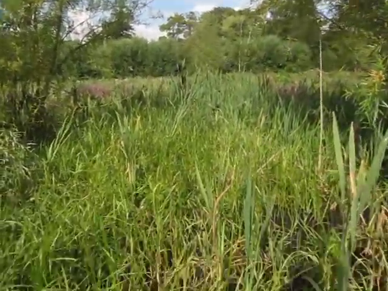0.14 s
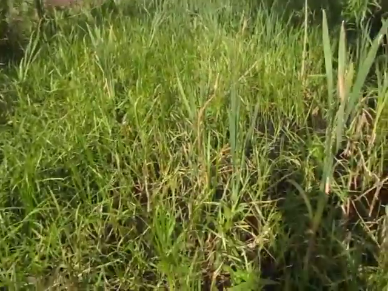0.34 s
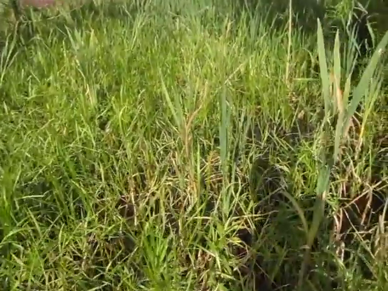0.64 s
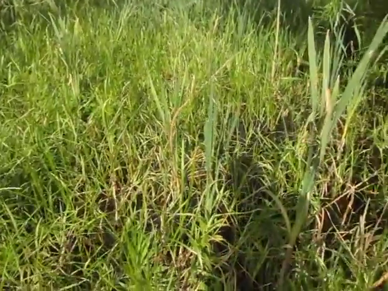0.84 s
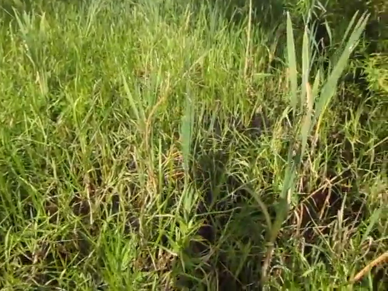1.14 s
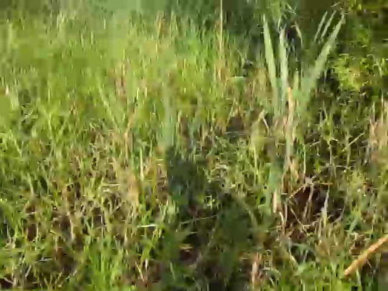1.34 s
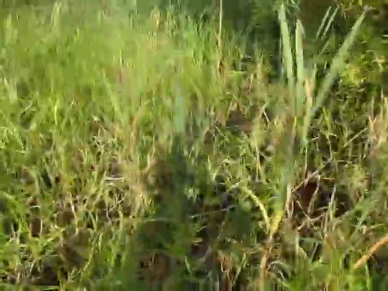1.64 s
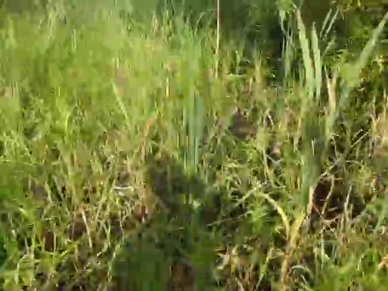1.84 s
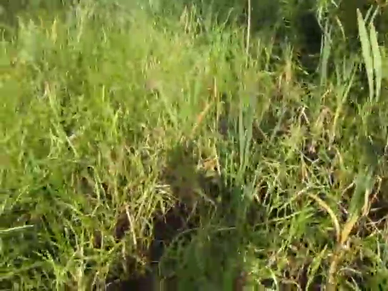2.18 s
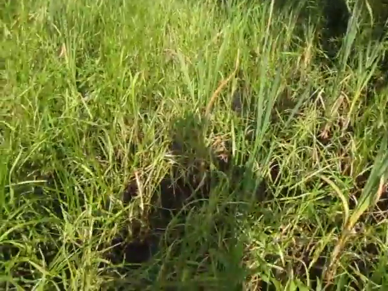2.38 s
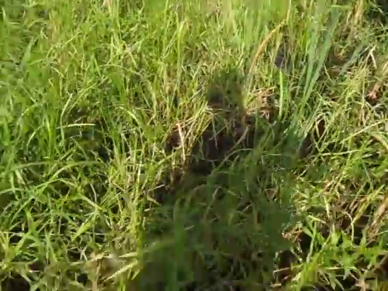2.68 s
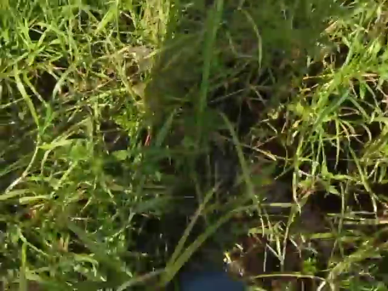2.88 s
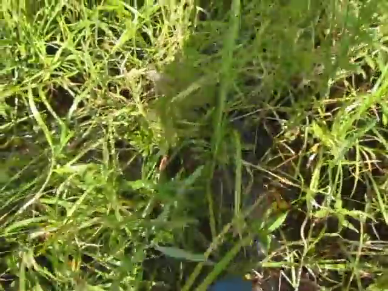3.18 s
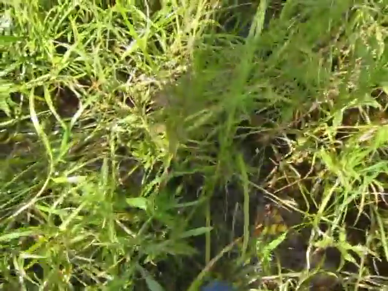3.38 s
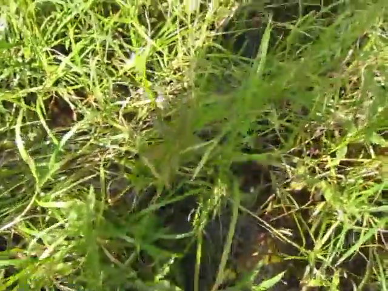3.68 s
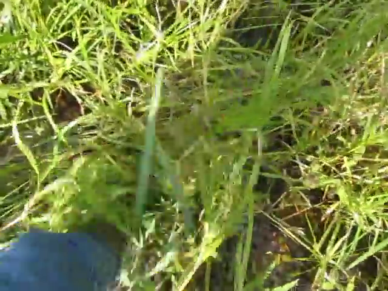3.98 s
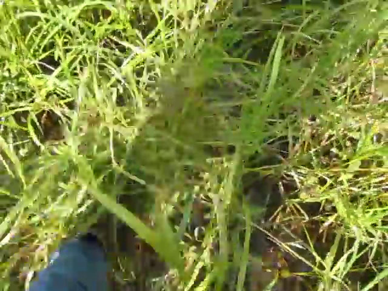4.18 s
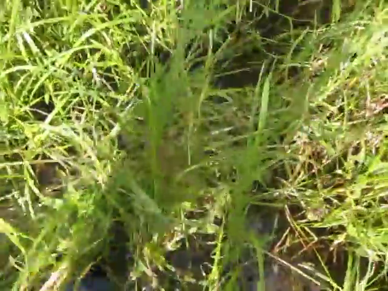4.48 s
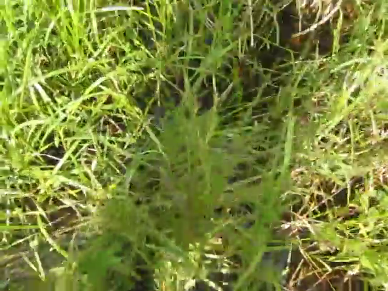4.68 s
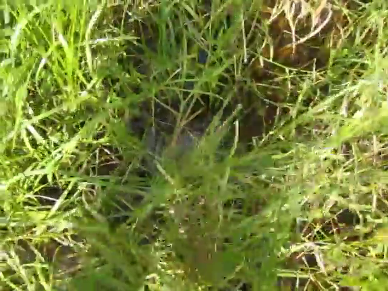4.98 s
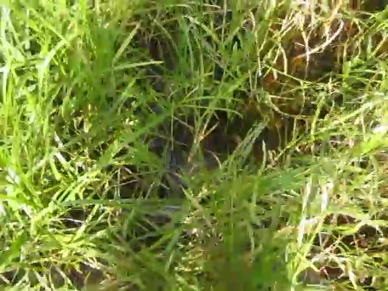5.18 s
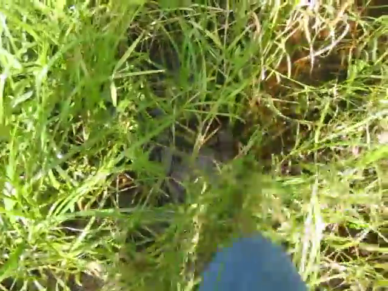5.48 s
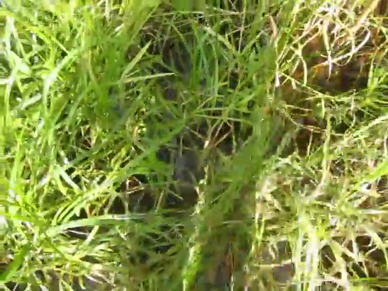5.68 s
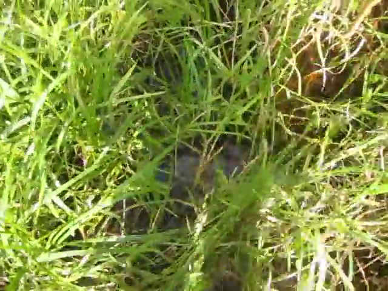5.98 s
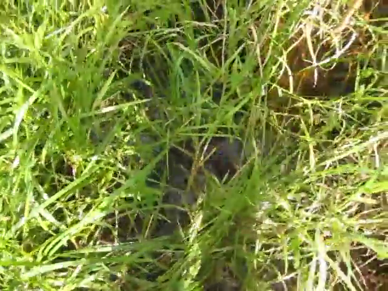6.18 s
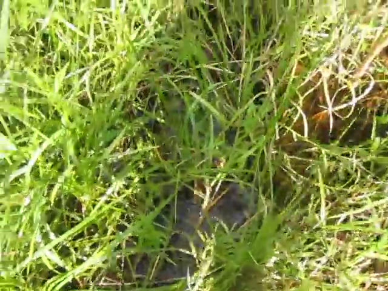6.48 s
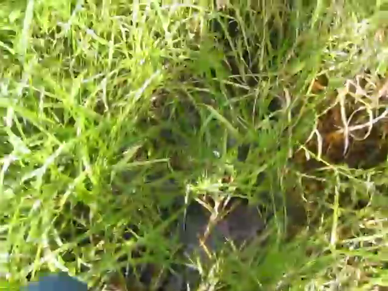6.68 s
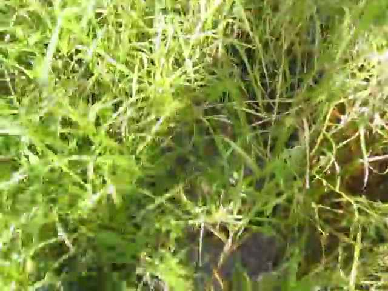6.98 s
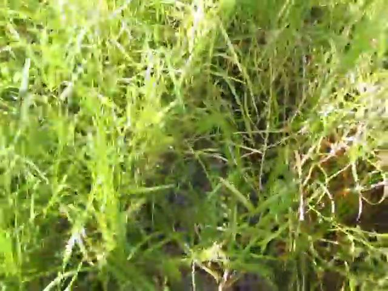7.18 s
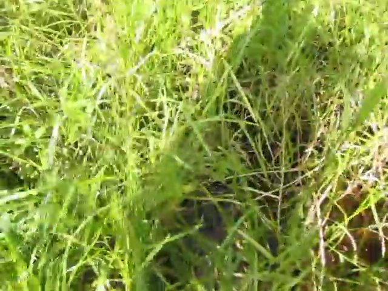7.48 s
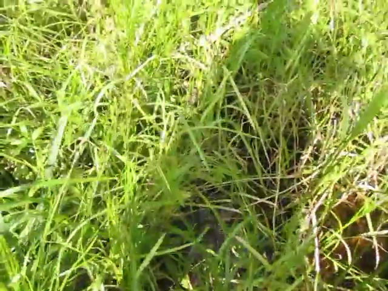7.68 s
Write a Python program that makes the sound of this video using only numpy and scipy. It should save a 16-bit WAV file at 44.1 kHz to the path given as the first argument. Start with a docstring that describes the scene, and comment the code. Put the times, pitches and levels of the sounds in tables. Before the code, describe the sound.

Someone trudges through boggy meadow grass: crunching stalks, wet pops and squelches, brushing swishes, a faint far engine and thin insect sizzle.

```python
"""Five slow steps swish through tall grass on waterlogged ground; stems crush and snap, mud squelches and pops.
Grass and stems are clicks and noise, filtered and driven by curves of leg effort and boot load.
Mud is bubbles of rising pitch over sloshing noise, with splashes, pops, squirts and dull thuds.
Behind: rumble, steady hums, a far engine picking up speed, the meadow's hiss and a thin insect sizzle."""
import sys
import numpy as np
from scipy import signal
from scipy.fft import rfft, irfft, next_fast_len
from scipy.io import wavfile
from scipy.ndimage import uniform_filter1d

SR = 44100
rng = np.random.default_rng(int(sys.argv[2]) if len(sys.argv) > 2 else 0)


def transcribe(signal):
    """Save signal, clipped to [-1, 1], as a 16-bit WAV file at the path in sys.argv[1]."""
    frames = np.atleast_2d(signal).T
    limited = np.clip(frames, -1, 1)
    pcm = np.round(limited * 32767).astype(np.int16)
    wavfile.write(sys.argv[1], SR, pcm)


N = 345744
TICKS_S = np.arange(0, N / SR, .001)   # control times of legs and boots

# grass stirring between swings: [t/s, level/dB before layer trims]
STIR_CURVE = [(0, -54.5), (0.45, -58.5), (1.8, -54.5), (2.5, -40), (3.05, -38.5), (3.4, -38), (4.6, -42),
              (5.0, -40.5), (6.2, -43), (7.55, -49.5), (7.84, -48.5)]
# boot presses on the wet mat, three per step (heel, full weight, push-off):
# [t/s, attack/s, hold/s, stems/dB and mud/dB before impact and layer trims, opened cavity f/Hz]
BOOT_PRESSES = [(0.657, 0.013, 0.11, -46.5, -36.5, 724), (1.1, 0.0093, .17, -37.5, -38, 955),
                (1.376, 0.038, 0.11, -43.5, -40.5, 983), (2.086, 0.027, 0.28, -41.5, -33.5, 581),
                (2.382, 0.043, 0.15, -34.5, -32.5, 824), (2.511, 0.018, 0.074, -34.5, -34.5, 742),
                (3.632, 0.021, 0.39, -42.5, -32, 538), (3.955, 0.085, 0.039, -30.5, -49, 865),
                (4.115, 0.026, 0.12, -35, -39.5, 750), (5.13, 0.0059, 0.3, -39, -35, 552),
                (5.493, 0.067, 0.055, -30, -30, 615), (5.596, 0.02, 0.057, -34.5, -35, 774),
                (6.577, 0.012, .36, -35, -36.5, 778), (6.968, 0.031, 0.11, -31.5, -45, 1030),
                (7.17, 0.038, 0.16, -40, -46, 788)]


def from_db(db):
    """Decibels to amplitude gain."""
    return 10 ** (np.asarray(db) / 20)


def rms_one(x):
    """Scale to unit power."""
    return x / np.sqrt(np.mean(x ** 2) + 1e-20)


def in_time(rows, axis=1):
    """One column of a curve, interpolated at every sample."""
    rows = np.array(rows)
    return np.interp(np.arange(N) / SR, rows[:, 0], rows[:, axis])


def per_sample(control):
    """Spread a control, given once a millisecond, over all samples."""
    return np.interp(np.arange(N) / SR, TICKS_S, control)


def drift(rate_hz):
    """Smooth random curve with about `rate_hz` turns a second; rms 1."""
    step = 40   # samples per control point
    settle = 2000   # control points dropped
    r = np.exp(-2 * np.pi * step * rate_hz / SR)
    noise = rng.standard_normal(N // step + settle + 2)
    slow = signal.lfilter([1], [1, -2 * r, r * r], noise)[settle:]
    return np.interp(np.arange(N) / step, np.arange(len(slow)), rms_one(slow))


def colour(x, spectrum):
    """Minimum-phase filter of the given spectrum, 18 dB/octave down for 3 octaves past its ends; rms 1."""
    size = next_fast_len(N + SR // 2) // 2 * 2
    octave = np.log2(np.maximum(np.arange(size // 2 + 1) * SR / size, 1))
    hz, db = np.transpose(spectrum)
    outside = np.abs(octave - np.clip(octave, np.log2(hz[0]), np.log2(hz[-1])))
    level_db = np.interp(octave, np.log2(hz), db) - 18 * np.minimum(outside, 3)
    # fold the cepstrum forwards in time to make the filter causal
    cepstrum = irfft(np.log(from_db(level_db)), size)
    cepstrum[1:size // 2] *= 2
    cepstrum[size // 2 + 1:] = 0
    response = np.exp(rfft(cepstrum))
    return rms_one(irfft(rfft(x, size) * response, size)[:N])


def grains(per_s, spread_db):
    """Random clicks of either sign, many small and a few large; rms 1."""
    born = rng.random(N) < per_s / SR
    sizes = from_db(spread_db * np.minimum(rng.exponential(1, N), 4.5))
    signs = rng.choice([-1, 1], N)
    return rms_one(born * sizes * signs / np.sqrt(per_s))   # denser clicks are each weaker


def resonate(x, hz, width_hz):
    """Single two-pole resonance with peak gain 1."""
    r = np.exp(-np.pi * width_hz / SR)
    zeros = np.array([1, 0, -1]) * (1 - r * r) / 2
    poles = [1, -2 * r * np.cos(2 * np.pi * hz / SR), r * r]
    return signal.lfilter(zeros, poles, x)


def add(track, s, sound):
    """Mix a short sound into the track at time s."""
    start = int(np.clip(s * SR, 0, N - 1))
    track[start:start + len(sound)] += sound[:N - start]


def bubble(hz, t60_s, glide, opening_cycles=3.2):
    """Air pocket that opens, then rings down 60 dB in t60; its pitch rises by the share `glide` meanwhile."""
    t60_s = max(t60_s, .002)
    t = np.arange(int(min(1.3 * t60_s, .1) * SR)) / SR
    age = t / t60_s
    tone = np.sin(2 * np.pi * np.cumsum(hz * (1 + glide * age)) / SR)
    opening = 1 - np.exp(-(t * hz / opening_cycles) ** 2)
    return tone * opening * from_db(-60 * age)


def froth(pitch_hz, per_s, scatter, cycles, spread_db, glide):
    """Random bubbles scattered around a pitch curve, levelled to an even flow."""
    out, draws = np.zeros(N), rng.standard_normal((7000, 3))
    times = np.cumsum(rng.exponential(1, len(draws))) / per_s
    for s, (size, detune, damping) in zip(times[times < (N - 1) / SR], draws):
        hz = min(pitch_hz[int(s * SR)] * np.exp(scatter * detune), SR / 3)
        t60_s = cycles / hz * np.exp(.3 * damping)
        add(out, s, from_db(spread_db * size) * bubble(hz, t60_s, glide))
    return out / np.sqrt(uniform_filter1d(out ** 2, size=2600) + 1e-6)


def leg_effort():
    """Brushing effort in dB: swings build and fade, each with a whip at its fastest; tufts and stirring add power."""
    # [fastest t/s, rustle/dB, build/(dB/s), fade/(dB/s), trail/s, whip/dB, whip attack/s]; dB before layer trims
    swings = [(1.11, -35.5, 6, 24.5, 0.41, -28.5, 0.017), (2.378, -31.5, 42, 16, 0.35, -28, 0.06),
              (3.898, -25.5, 42.5, 10.5, 0.47, -19, 0.045), (5.479, -28, 26.5, 24, 0.43, -20.5, 0.062),
              (6.96, -24, 31, 33, 0.46, -21, 0.2)]
    # tufts dragging over the trousers: [t/s, level/dB before layer trims, 1/e half-width of power/s]
    tuft_drags = [(0.595, -40.5, 0.017), (2.885, -32.5, 0.039), (3.107, -42, 0.023), (3.523, -26.5, 0.013),
                  (3.65, -29.5, 0.079), (3.826, -22.5, .03), (4.136, -27, 0.018), (4.315, -39, 0.033),
                  (5.649, -27.5, 0.044), (6.663, -30, 0.038)]
    lead_s, release_db_per_s, whip_decay_s = .52, 116, 0.08
    power = from_db(np.interp(TICKS_S, *np.transpose(STIR_CURVE))) ** 2
    for s, rustle_db, build, fade, trail_s, whip_db, attack_s in swings:
        before, after = np.maximum(s - TICKS_S, 0), np.maximum(TICKS_S - s, 0)
        # time outside the swing, where the rustle falls faster
        clear_s = np.maximum(before - lead_s, 0) + np.maximum(after - trail_s, 0)
        power += from_db(rustle_db - build * before - fade * after - release_db_per_s * clear_s) ** 2
        power += (from_db(whip_db) * np.exp(-before / attack_s - after / whip_decay_s)) ** 2
    for s, db, length_s in tuft_drags:
        power += from_db(db) ** 2 * np.exp(-((TICKS_S - s) / length_s) ** 2)
    return per_sample(10 * np.log10(power))


def swish(effort_db, level_db=-1.0, per_s=5000, spread_db=2.5, smooth=0.95, flutter_db=1.15, patchy_db=1.5):
    """Rough blade edges slip over cloth: more slips with effort; frequency bands waver like separate tufts."""
    # blade spectrum: [f/Hz, relative level/(dB per Hz)]
    blade_spectrum = [(1200, -26.5), (2500, -11.5), (4000, -5), (6000, -3), (8500, 0.5), (11500, 0.5),
                      (13500, -3), (16000, -12.5)]
    slip_rate = per_s * from_db(effort_db + 32.0)   # per_s holds at -32 dB effort
    slips = grains(slip_rate, spread_db) + smooth * rng.standard_normal(N)
    sound = colour(slips, blade_spectrum)
    tufts = np.zeros(N)
    for hz in np.geomspace(2800, 13500, 10):
        tufts += resonate(sound, hz, hz / 6) * (from_db(patchy_db * drift(58)) - 1)
    # a few blades flutter; a whole sheaf of them evens out
    depth_db = flutter_db * np.clip(from_db(-.4 * (effort_db + 29.0)), .5, 1.3)
    return rms_one(sound + tufts) * from_db(level_db + effort_db + depth_db * drift(35))


def flicks(effort_db, level_db=-45, per_band_s=14, width=0.14):
    """Bent stalks spring back with dry ticks: random clicks in eight narrow bands, following the effort."""
    raised_db = effort_db + 32.5
    rate = per_band_s * from_db(0.45 * raised_db)
    ticks = sum(resonate(grains(rate, 2.3), hz, width * hz) for hz in np.geomspace(2400, 10000, 8))
    gate = np.clip(raised_db / 14 + 1.2, 0, 1)   # silent at low effort
    return from_db(level_db + raised_db) * gate * rms_one(ticks)


def squeaks(width_hz=550):
    """Taut blades stick and slip along the boot: noise rings in one narrow band under a bell envelope."""
    # [t/s, level/dB before the envelope, f/Hz, 1/e half-width/s]
    squeak_events = [(0.668, -24, 6660, 0.0018), (0.874, -34, 6300, 0.01), (2.82, -34, 7100, 0.01),
                     (3.308, -38, 4030, .008), (3.39, -31.5, 9350, 0.023), (3.53, -28, 9400, 0.0072),
                     (3.637, -25, 11150, 0.0063)]
    out, t = np.zeros(N), np.arange(-SR // 20, SR // 20) / SR
    for s, db, hz, length_s in squeak_events:
        ring = rms_one(resonate(rng.standard_normal(len(t)), hz, width_hz))
        add(out, s + t[0], from_db(db) * ring * np.exp(-(t / length_s) ** 2))
    return out


def boot_load():
    """Gains of stems and mud: each press starts with an impact, sags while it holds, then lets go."""
    impact_s, sag_db_per_s = 0.022, 1
    stems_impact_db, stems_release_db_per_s = 6.5, 63
    mud_impact_db, mud_release_db_per_s = 0.5, 128
    # stems and mud never quite rest: levels relative to the stirring grass
    stems_stir_db, mud_stir_db = -11.5, -30
    stir_db = np.interp(TICKS_S, *np.transpose(STIR_CURVE))
    stems, mud = from_db(stir_db + stems_stir_db) ** 2, from_db(stir_db + mud_stir_db) ** 2
    for s, attack_s, hold_s, stems_db, mud_db, _ in BOOT_PRESSES:
        before, after = np.maximum(s - TICKS_S, 0), np.maximum(TICKS_S - s, 0)
        push = np.exp(-before / attack_s) * from_db(-sag_db_per_s * after)
        impact, released_s = np.exp(-after / impact_s), np.maximum(after - hold_s, 0)
        stems += (push * from_db(stems_db + stems_impact_db * impact - stems_release_db_per_s * released_s)) ** 2
        mud += (push * from_db(mud_db + mud_impact_db * impact - mud_release_db_per_s * released_s)) ** 2
    return per_sample(np.sqrt(stems)), per_sample(np.sqrt(mud))


def crush(load, level_db=-3.0, per_s=1500, smooth=0.71, clump_db=2.0):
    """Wet stems buckle in clumps under the sole: equal clicks and noise of drifting level."""
    # stem spectrum: [f/Hz, relative level/(dB per Hz)]
    stem_spectrum = [(500, -29), (900, -6), (1500, 0), (2500, 1), (4000, -1.5), (6000, -2), (10000, -13)]
    cracks = grains(per_s, spread_db=0) + smooth * rng.standard_normal(N)
    clumped = cracks * from_db(clump_db * drift(21))
    return from_db(level_db) * load * colour(clumped, stem_spectrum)


def splinters(load, level_db=-9, per_band_s=22, spread_db=3.5, width=.3):
    """Smaller stalks crack at random under the load: clicks ring in six bands."""
    cracks = sum(resonate(grains(per_band_s, spread_db), hz, width * hz) for hz in np.geomspace(1200, 5000, 6))
    return from_db(level_db) * load * rms_one(cracks)


def snaps(trim_db=-1.0, crack=0.89):
    """A stem gives way within milliseconds and rings briefly; broad snaps crack the most."""
    # [t/s, peak/dB before trim, f/Hz, decay/s, bandwidth as a share of f]
    snap_events = [(0.667, -21, 3500, .002, .4), (1.1047, -9, 7500, .003, 0.17),
                   (1.3022, -26, 6370, .0014, .18), (1.4728, -17.5, 4000, 0.0015, 0.45),
                   (2.5512, -10.5, 3620, .0016, .16), (2.86, -14, 5000, 0.0031, .35),
                   (4.0014, -9, 3270, 0.0025, 0.33), (4.3453, -11.5, 9000, .0014, .25),
                   (4.4052, -7.5, 4630, 0.0021, 0.27), (4.4203, -14.5, 4250, 0.0013, 0.33),
                   (4.757, -14, 10500, 0.00091, .14), (5.124, -16.5, 2150, 0.0026, 0.18),
                   (5.9017, -10, 9800, 0.0034, 0.19), (5.934, -22, 2800, 0.0022, .35),
                   (7.159, -16, 5430, 0.003, .14), (7.1884, -12.5, 5170, .0023, 0.45),
                   (7.3053, -15, 10700, .0007, .19), (7.5065, -23, 9350, 0.00094, .11)]
    out, t = np.zeros(N), np.arange(SR // 25) / SR
    high = signal.butter(2, 1500, "high", fs=SR, output="sos")
    for s, db, hz, decay_s, width in snap_events:
        tear = signal.sosfilt(high, rng.standard_normal(len(t)) * np.exp(-t / decay_s))
        snap = resonate(tear, hz, width * hz) + crack * width * tear
        add(out, s, from_db(db + trim_db) * snap / np.abs(snap).max())
    return out


def cavity_pitch():
    """The hollow under the boot starts tight and opens after each press, so its pitch drops."""
    squeeze_share, opens_s = 0.41, 0.051
    squeeze = sum((TICKS_S >= s) * np.exp(-np.abs(TICKS_S - s) / opens_s) for s, *_ in BOOT_PRESSES)
    return in_time(BOOT_PRESSES, axis=5) * per_sample(1 + squeeze_share * squeeze)


def squelch(load, bubbles_db=-4, slosh_db=-7, gulp_db=2.6):
    """Heavily damped bubbles around the cavity pitch, over sloshing water; it comes in gulps."""
    bubbles = froth(cavity_pitch(), per_s=420, scatter=0.258, cycles=14.2, spread_db=4.5, glide=0.25)
    slosh = colour(grains(1400, 2.7), [(200, -14), (430, -3.5), (750, -8.0), (1400, -3.0)])
    gulps = from_db(gulp_db * drift(8.2))
    return load * gulps * (from_db(bubbles_db) * bubbles + from_db(slosh_db) * slosh)


def fizz(load, level_db=-6, pitch_hz=3200):
    """Tiny bubbles and droplets squeezed from the wet mat of stems."""
    bubbles = froth(np.full(N, pitch_hz), per_s=600, scatter=0.431, cycles=22, spread_db=7.5, glide=0.083)
    return from_db(level_db) * load * bubbles


def plunges(per_s=6000, spread_db=4.0):
    """Spray and tearing stems as the boot breaks through: coloured clicks in short bursts."""
    # [t/s, level/dB, rise/s, decay/s]
    plunge_events = [(1.11, -20, 0.0043, 0.042), (2.373, -21, 0.013, 0.046), (5.493, -20, 0.0051, 0.014),
                     (6.987, -21, 0.0062, 0.019)]
    # spray spectrum: [f/Hz, relative level/(dB per Hz)]
    splash_spectrum = [(180, -50), (350, -6), (700, 4), (1600, 2.5), (2700, -2), (5500, 0), (10000, -15),
                       (16000, -22)]
    t, force = np.arange(N) / SR, np.zeros(N)
    for s, db, rise_s, decay_s in plunge_events:
        force += from_db(db) * np.exp(-np.maximum((s - t) / rise_s, (t - s) / decay_s))
    return force * colour(grains(per_s, spread_db), splash_spectrum)


def pops(glide=0.058, upper_db=-14, upper_ratio=1.88):
    """Larger air pockets burst open at once; their uneven shape gives a short upper mode."""
    # [t/s, level/dB before the bubble envelope, starting f/Hz, t60/s]
    pop_events = [(0.08, -29.5, 902, 0.021), (0.658, -15.5, 1300, 0.015), (0.665, -22.5, 2090, .023),
                  (0.676, -19.5, 1030, .023), (0.792, -24, 880, 0.046), (0.937, -29, 781, 0.03),
                  (1.105, -11, 1706, 0.032), (1.108, -10.5, 844, .025), (1.157, -12.5, 2110, 0.0088),
                  (1.375, -21, 1070, 0.024), (1.478, -27.5, 1070, .025), (2.089, -18, 576, 0.037),
                  (2.107, -21, 1510, .025), (2.295, -17.5, 800, 0.039), (2.344, -13, 800, 0.032),
                  (2.371, -4, 890, 0.012), (2.88, -18, 1385, 0.033), (3.738, -26, 566, 0.033),
                  (3.779, -20, 870, .03), (3.934, -3.5, 830, 0.014), (3.947, -11, 930, 0.015),
                  (3.954, -15, 1130, 0.031), (4.139, -20, 700, 0.017), (4.177, -7.5, 695, 0.0089),
                  (4.207, -20.5, 1130, 0.026), (4.292, -28.5, 606, 0.059), (5.137, -16.5, 670, .02),
                  (5.174, -18, 525, 0.048), (5.234, -18, 579, .025), (5.433, -18, 640, 0.062),
                  (5.603, -20.5, 1130, .035), (5.656, -19, 647, 0.036), (6.57, -19.5, 970, 0.023),
                  (6.853, -17.5, 1270, 0.018), (6.876, -17.5, 1530, .02), (7.089, -17.5, 685, 0.016),
                  (7.156, -21, 610, 0.023), (7.177, -14.5, 720, 0.011), (7.186, -23.5, 781, 0.028),
                  (7.226, -26, 1270, .025), (7.346, -29, 1090, 0.025)]
    out = np.zeros(N)
    for s, db, hz, t60_s in pop_events:
        add(out, s, from_db(db) * bubble(hz, t60_s, glide, opening_cycles=.7))
        add(out, s, from_db(db + upper_db) * bubble(hz * upper_ratio, t60_s / 2, glide, opening_cycles=.7))
    return out


def squirts(length_s=0.013, rise_ratio=1.4):
    """Water squirts through a closing gap; the cavity shrinks as it leaves, so the pitch sweeps up."""
    # [t/s, peak/dB, starting f/Hz]
    squirt_events = [(2.699, -31, 1800), (2.859, -28.5, 1900), (3.62, -29, 1300), (5.295, -29.5, 1395),
                     (6.601, -32, 1250), (6.985, -23, 1930)]
    out, age = np.zeros(N), np.linspace(0, 1, int(length_s * SR))
    envelope = np.sin(np.pi * np.sqrt(age)) ** 2
    for s, db, start_hz in squirt_events:
        phase = 2 * np.pi * np.cumsum(start_hz * rise_ratio ** age) / SR
        add(out, s, from_db(db) * envelope * np.sin(phase))
    return out


def thuds(t60_s=0.036, contact_db=-9, contact_s=0.003):
    """Soft ground thuds under the sole: a rough contact and a dull ring."""
    # [t/s, ring peak/dB, starting f/Hz]
    thud_events = [(1.106, -17.5, 484), (2.167, -29, 425), (2.377, -29.5, 318), (3.755, -26, 426),
                   (5.514, -23, 340), (6.706, -30, 407)]
    out, t = np.zeros(N), np.arange(SR // 100) / SR
    soft = signal.butter(1, [350, 2200], "band", fs=SR, output="sos")
    for s, db, hz in thud_events:
        ring = bubble(hz, t60_s, glide=0.036, opening_cycles=0.78)
        contact = signal.sosfilt(soft, rng.standard_normal(len(t)) * np.exp(-t / contact_s))
        add(out, s, from_db(db) * ring / np.abs(ring).max())
        add(out, s, from_db(db + contact_db) * contact / np.abs(contact).max())
    return out


def drone(hz, db, wander=0.00663, waver_db=1.5):
    """Far engine tone: a sine of the given rms level whose pitch and level waver on the way through the air."""
    phase = 2 * np.pi * np.cumsum(hz * (1 + wander * drift(3.7))) / SR
    return np.sqrt(2) * np.sin(phase) * from_db(db + waver_db * drift(2.6))


def engine():
    """A distant engine idles, pulls away and drops back: one drone at its firing rate."""
    # [t/s, firing f/Hz, level/dB], before wander and waver
    engine_curve = [(0, 72, -54), (1, 71.5, -39), (2.5, 70.5, -49), (3.2, 72.4, -36), (3.9, 77.5, -37.5),
                    (4.6, 86, -40.5), (5.1, 96, -41), (5.7, 107, -44), (6.4, 116, -43), (6.85, 119, -40),
                    (7.1, 69, -58), (7.4, 69, -35), (7.84, 74, -33)]
    return drone(in_time(engine_curve), in_time(engine_curve, axis=2))


def rumble(noise_db=-34.5):
    """Low coloured noise and steady far-off machinery, swelling together."""
    # rumble spectrum: [f/Hz, relative level/(dB per Hz)]
    rumble_spectrum = [(15, -6.5), (25, -0.5), (40, -2.5), (55, 1), (72, -3), (95, -3.5), (125, -11.5),
                       (175, -16.5), (260, -24), (400, -32.5), (700, -66.5)]
    # machinery tones: [f/Hz, level/dB], before wander, waver and swell
    machinery = [(58, -45), (121, -48), (145.2, -51.5)]
    # swell of noise and machinery: [t/s, gain/dB]
    rumble_swell = [(0, 2.5), (1.4, 1), (3.0, 1.5), (3.85, 3), (3.97, -2), (4.6, -2), (6.87, 3), (7.07, -7),
                    (7.35, -0.5), (7.84, 2)]
    noise = from_db(noise_db) * colour(rng.standard_normal(N), rumble_spectrum)
    hums = sum(drone(hz, db) for hz, db in machinery)
    return from_db(in_time(rumble_swell)) * (noise + hums)


def meadow_hiss(level_db=-49):
    """The meadow's far hiss: coloured noise that slowly swells."""
    # hiss spectrum: [f/Hz, relative level/(dB per Hz)]
    air_spectrum = [(150, 2), (400, 0), (950, 0.5), (1500, -2.5), (2500, -11.5), (4000, -13.5), (6000, -10),
                    (8500, -11), (11000, -13), (13000, -14), (16000, -29)]
    # swell: [t/s, gain/dB]
    air_swell = [(0, 2), (1.8, 1), (3.3, -1), (4.6, -5), (5.1, -0.5), (6.3, -0.5), (7.84, -0.5)]
    return from_db(level_db + in_time(air_swell)) * colour(rng.standard_normal(N), air_spectrum)


def insects(level_db=-54, pulse_db=2.0, sway_db=1.5):
    """Many far grasshoppers merge into a thin, irregularly pulsing sizzle of high noise."""
    # sizzle spectrum: [f/Hz, relative level/(dB per Hz)]
    insect_spectrum = [(8500, -22), (10000, 2), (10900, 9), (11800, 0), (13000, -15)]
    gain = from_db(level_db + pulse_db * drift(30) + sway_db * drift(0.57))
    return gain * colour(rng.standard_normal(N), insect_spectrum)


def scene():
    """Grass, mud and open air in one channel."""
    effort_db = leg_effort()
    on_stems, on_mud = boot_load()
    grass = swish(effort_db) + flicks(effort_db) + squeaks()
    stems = crush(on_stems) + splinters(on_stems) + snaps()
    marsh = squelch(on_mud) + fizz(on_stems) + plunges() + pops() + squirts() + thuds()
    background = engine() + rumble() + meadow_hiss() + insects()
    return (grass + stems + marsh + background)[None, :]


def record(dry):
    """Steep elliptic low-pass: the top is cut above 15.9 kHz."""
    cutoff_hz = 15900
    low_pass = signal.ellip(12, .1, 90, cutoff_hz, fs=SR, output="sos")   # 0.1 dB ripple, 90 dB stop band
    return signal.sosfilt(low_pass, dry)


dry = scene()
out = record(dry)
transcribe(out)
```